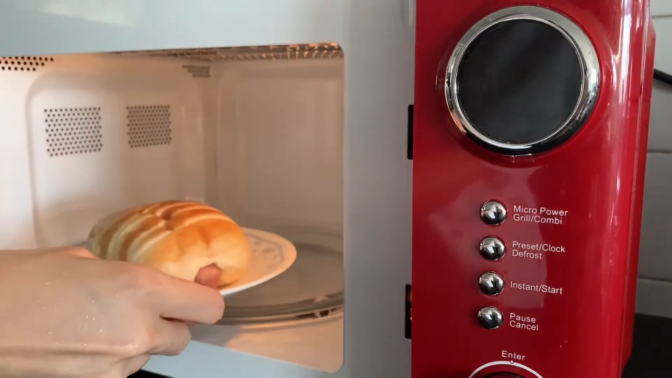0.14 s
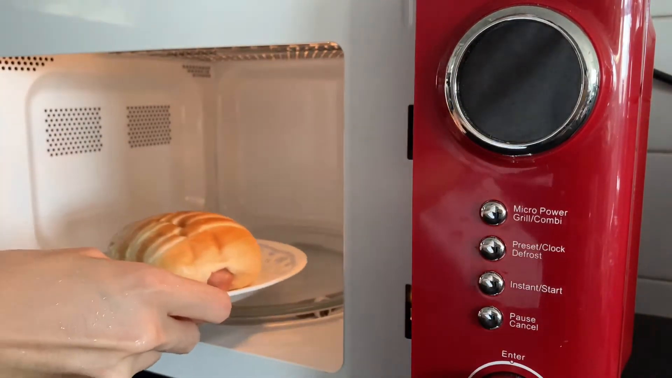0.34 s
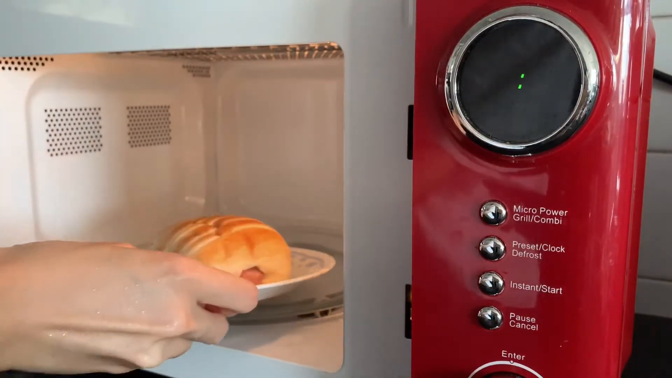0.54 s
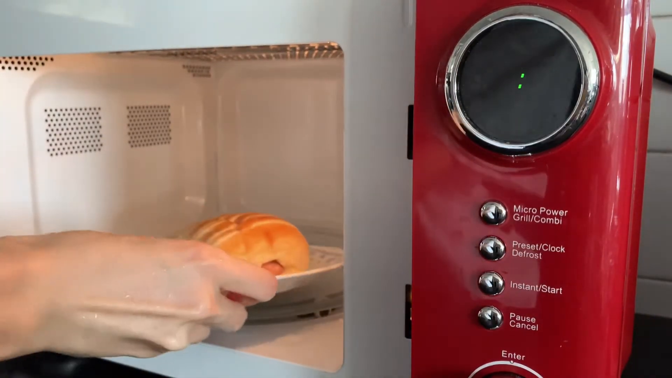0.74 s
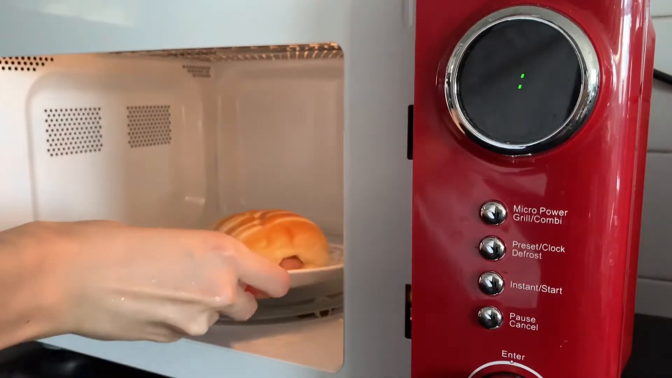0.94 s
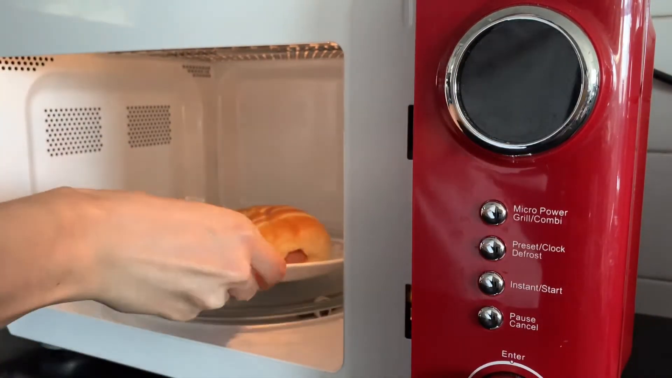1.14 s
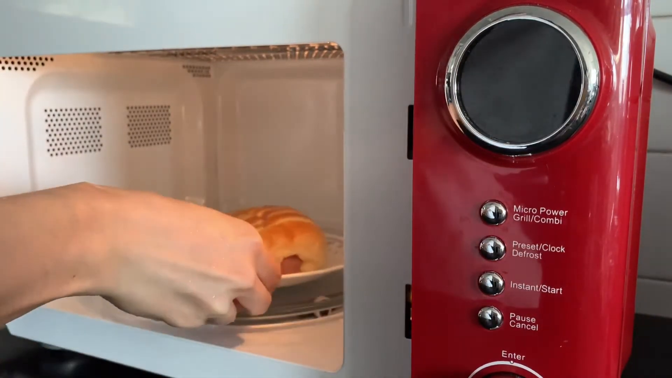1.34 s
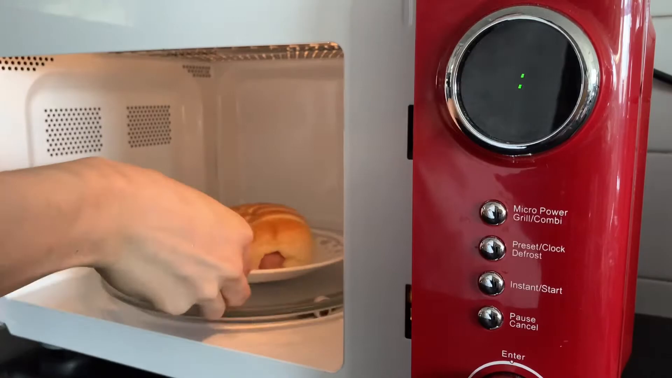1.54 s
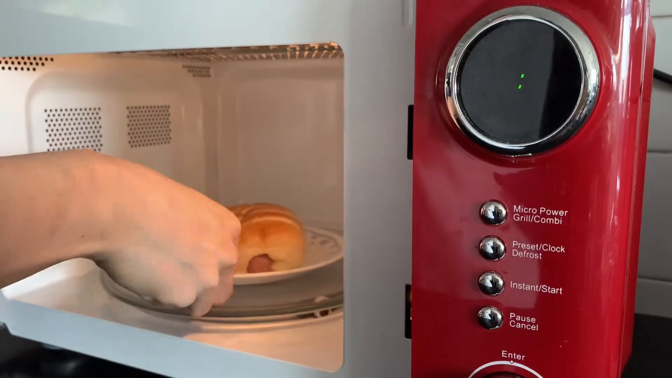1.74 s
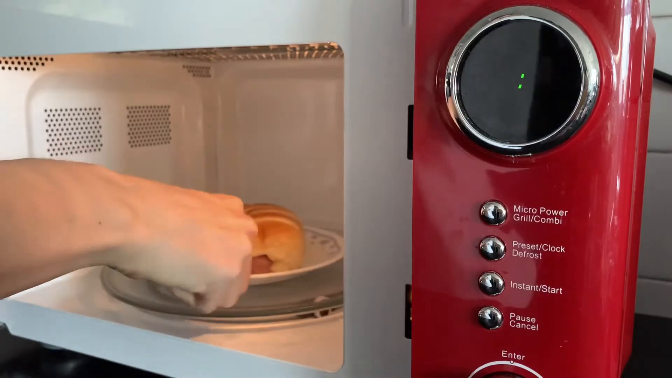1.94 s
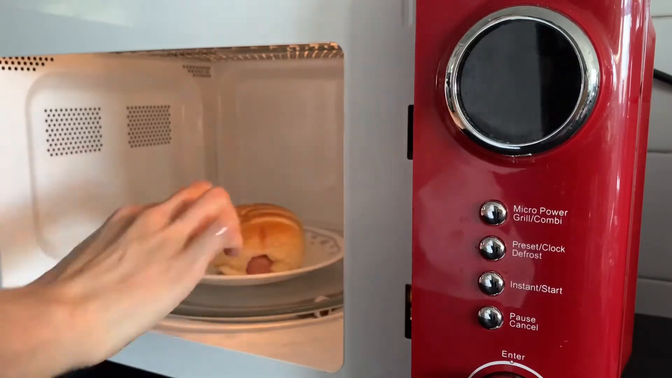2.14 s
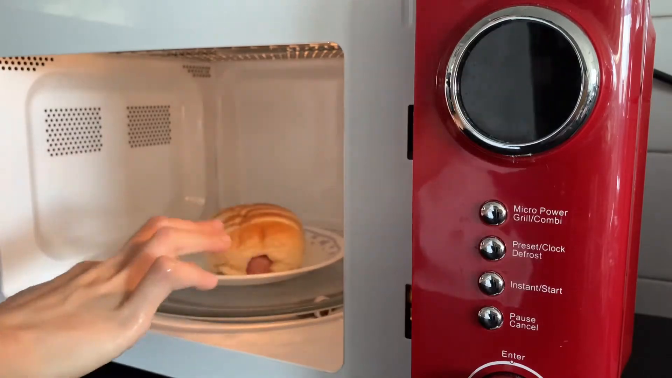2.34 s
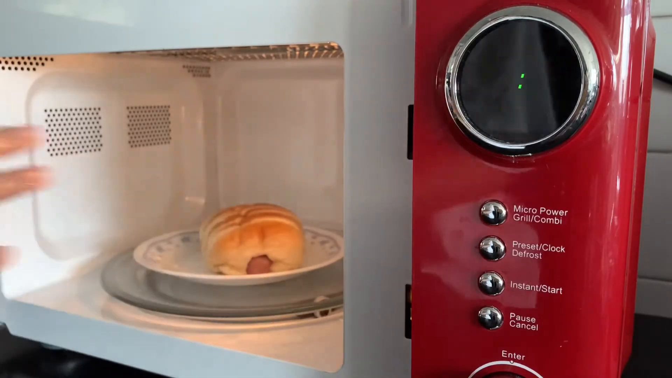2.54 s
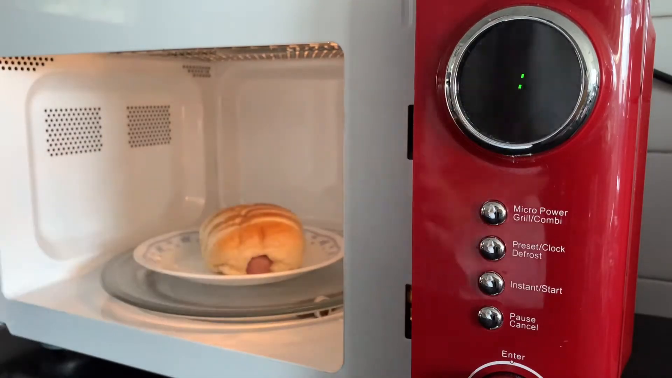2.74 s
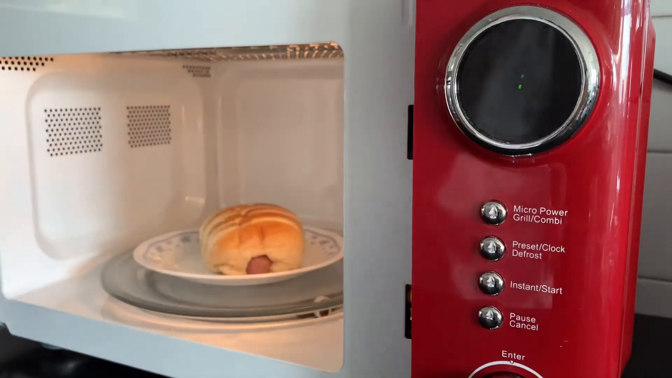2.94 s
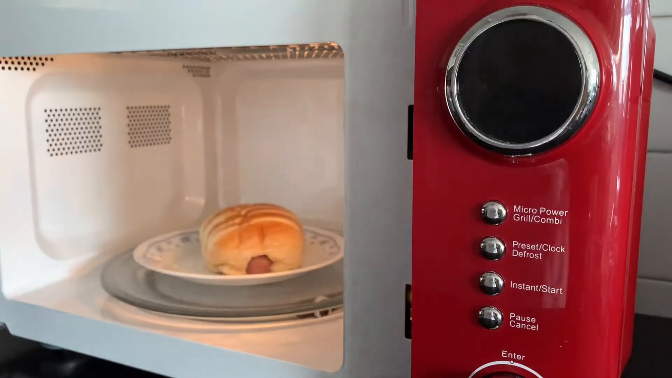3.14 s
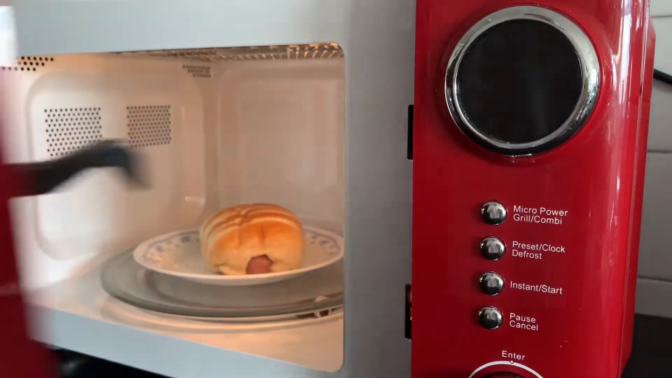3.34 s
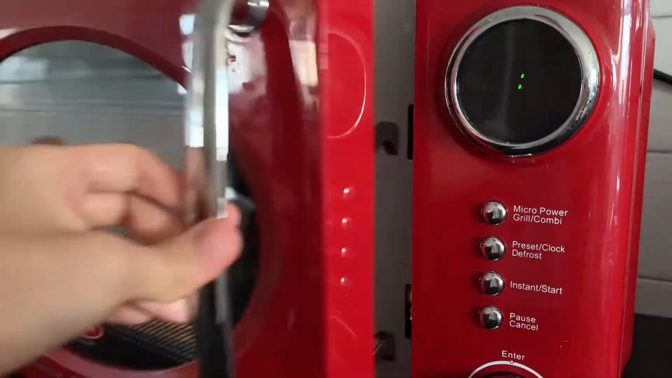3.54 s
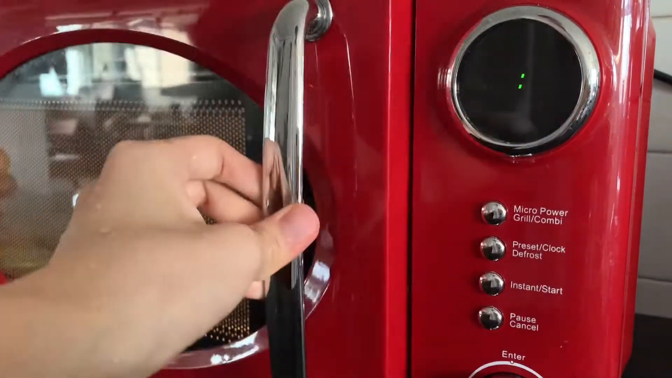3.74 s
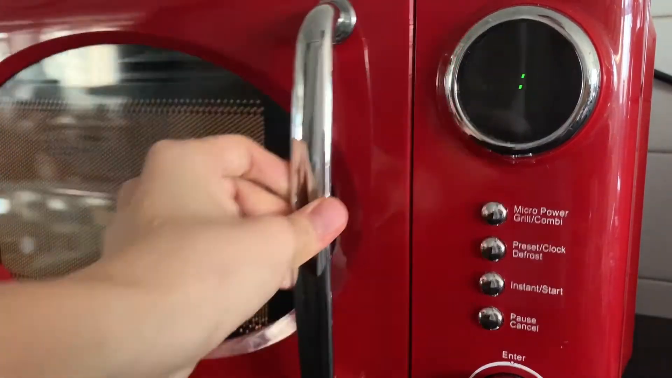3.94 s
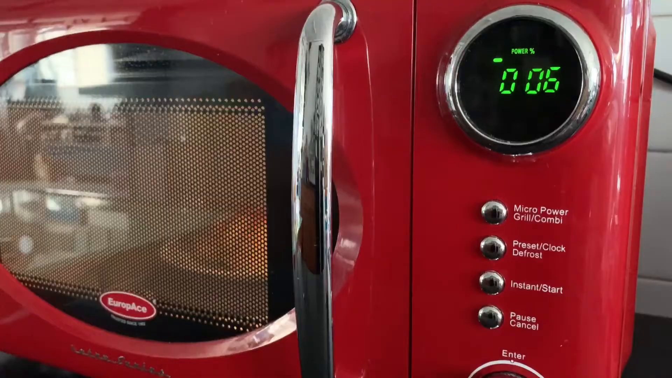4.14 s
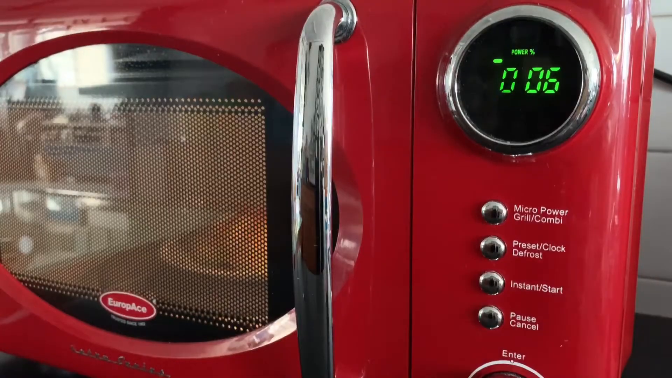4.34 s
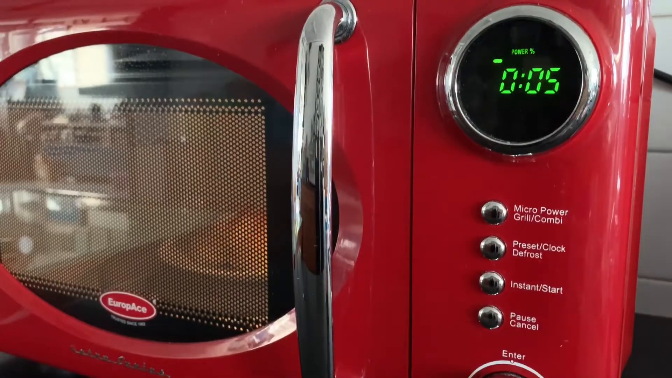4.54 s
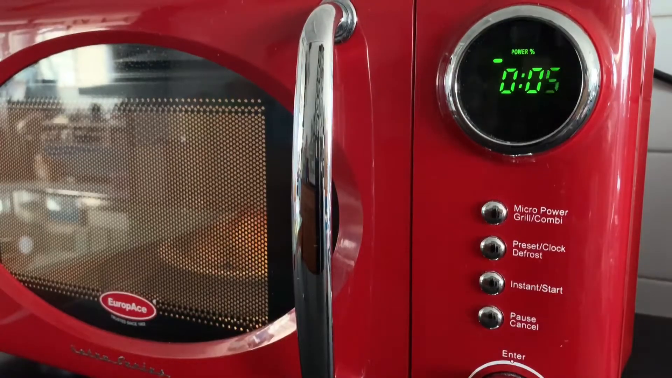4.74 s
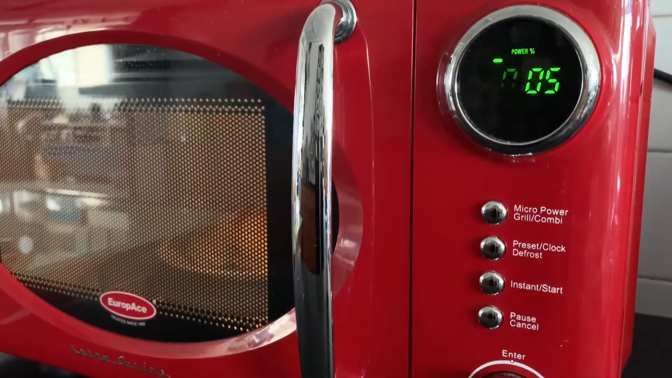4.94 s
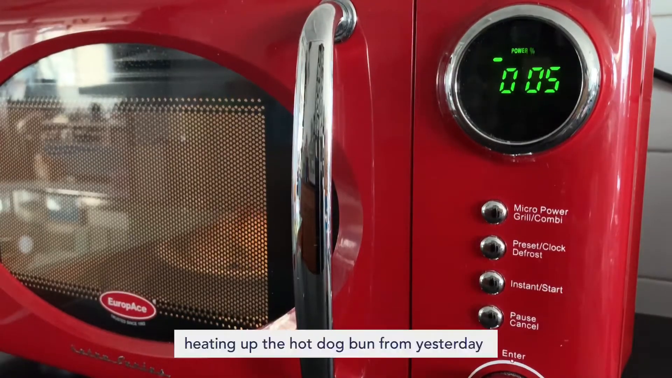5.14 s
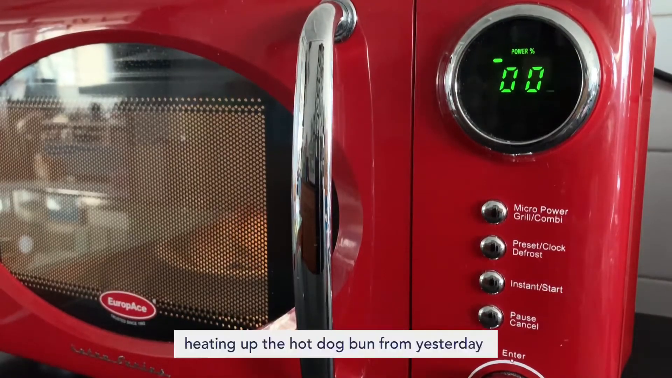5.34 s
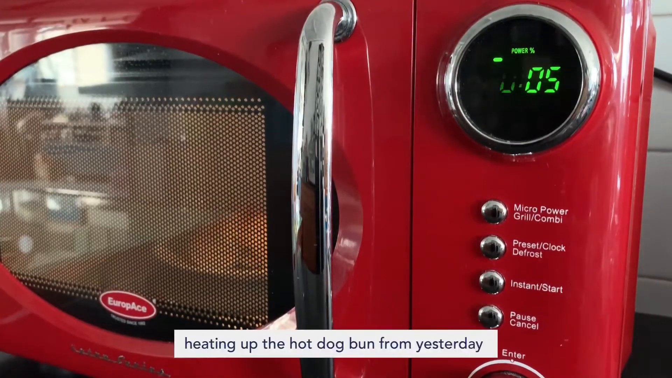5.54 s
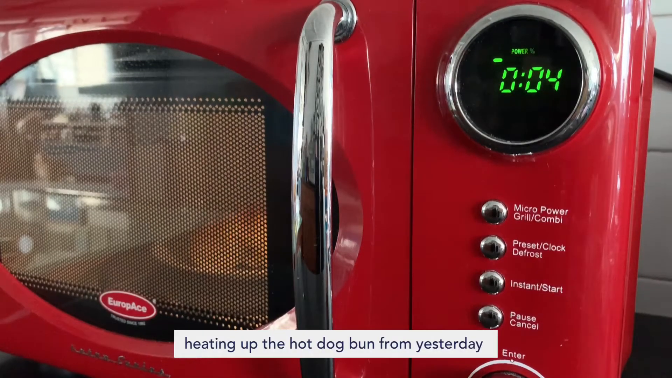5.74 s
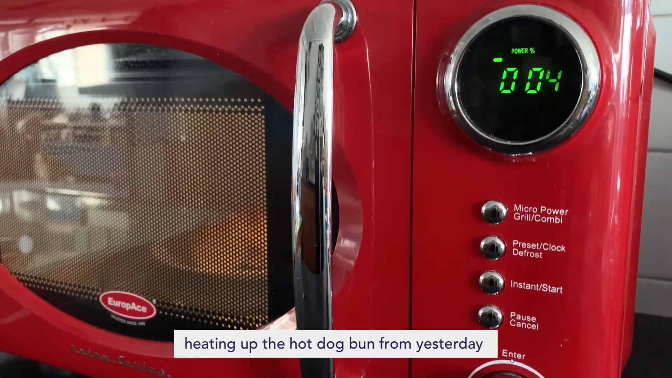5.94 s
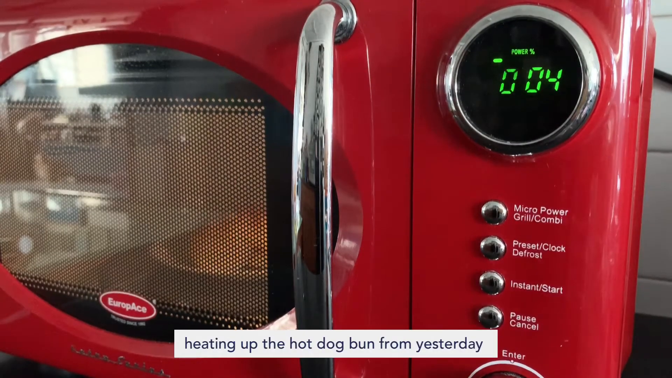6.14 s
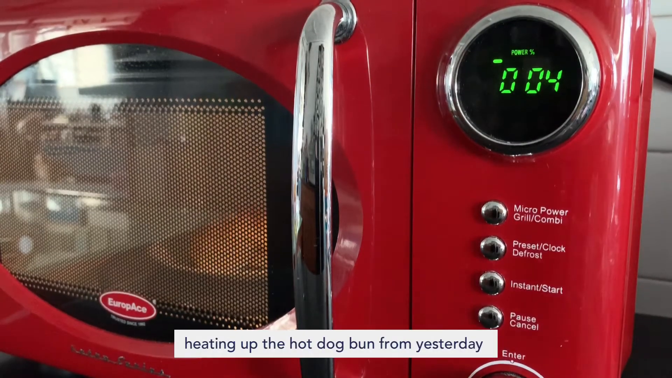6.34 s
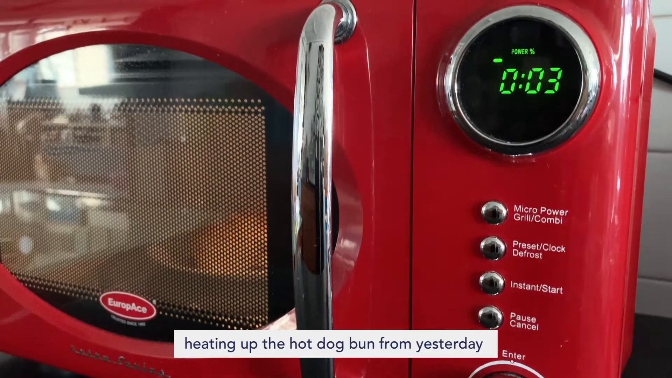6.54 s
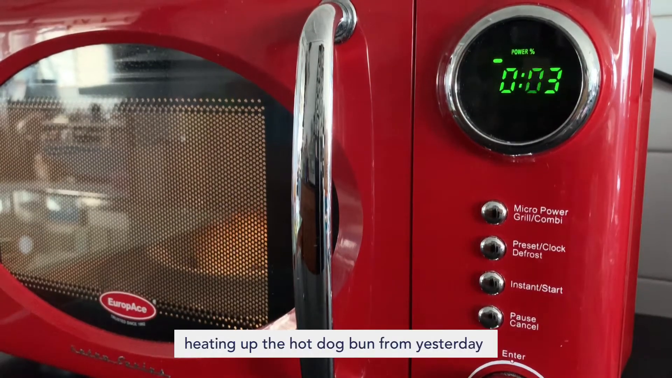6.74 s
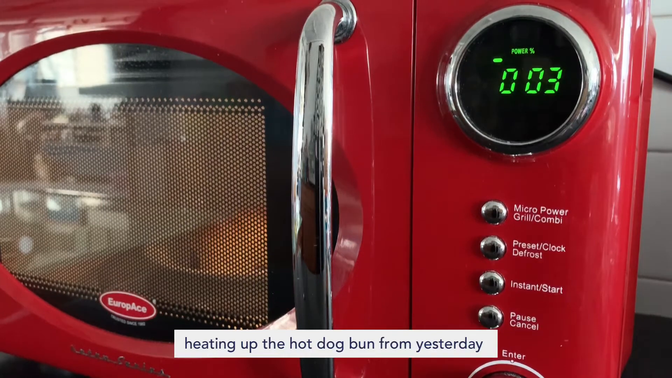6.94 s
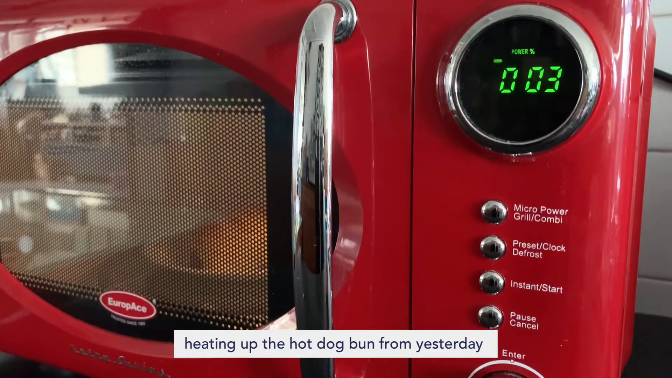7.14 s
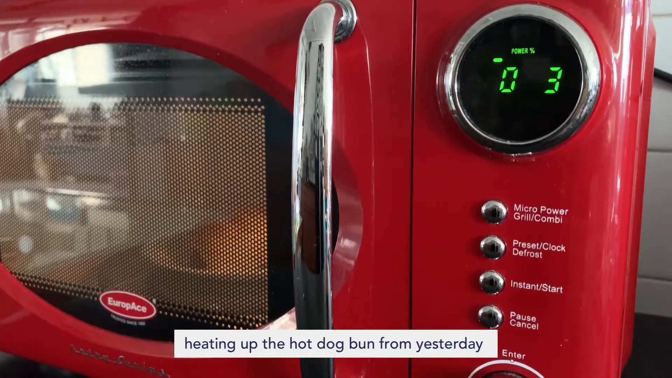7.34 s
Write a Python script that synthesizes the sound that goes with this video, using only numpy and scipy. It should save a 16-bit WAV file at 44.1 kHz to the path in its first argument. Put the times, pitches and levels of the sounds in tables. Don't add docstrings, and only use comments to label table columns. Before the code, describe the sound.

Bright plate clink on ringing glass, small nudges, a loud latching door slam, then abruptly a steady fan hum, a far thud and faint water.

```python
import sys
import numpy as np
from scipy import signal
from scipy.fft import rfft, irfft
from scipy.io import wavfile
from scipy.ndimage import uniform_filter1d

SR = 44100
rng = np.random.default_rng(int(sys.argv[2]) if len(sys.argv) > 2 else 0)


def ratio_of_db(decibels):
    return 10 ** (np.asarray(decibels, float) / 20)


def wrap_up_sound(samples):
    columns = np.atleast_2d(samples).T
    tamed = np.clip(columns, -1, 1)
    steps = np.round(tamed * 32767).astype(np.int16)
    wavfile.write(sys.argv[1], SR, steps)


N = 326340
CUT = 3.9664

# mode in Hz, level in dB, t60 in seconds.
PRESSED_PLATE = [(761, -14, 0.24), (820, -12, 0.2), (1100, -1, 0.19), (1350, 0.5, 0.12), (1470, 5.5, 0.064),
                 (1720, -1.5, 0.11), (2240, -18.5, 0.31), (3122, -16, 0.22), (3920, -21, 0.15),
                 (4730, -13.5, 0.06), (6400, -22.5, 0.082), (6970, -20, 0.1), (8850, -43, 0.099),
                 (9500, -34.5, 0.069)]
# mode in Hz, level in dB, t60 in seconds.
GLASS_KNOCK = [(242, -10, 0.38), (220.7, -15.5, 0.43), (491.7, -22.5, 0.33), (940, -17, 0.0077),
               (1140, 4.5, 0.01), (1667, 2.5, 0.036), (1720, -1, 0.042), (4000, -4, 0.0247)]


def evened(x):
    return x / np.sqrt(np.mean(x ** 2) + 1e-20)


def read(points, hz):
    f, value = np.transpose(points)
    return np.interp(np.log(hz + 1), np.log(f + 1), value)


def curve(rows, axis=1):
    rows = np.array(rows)
    return np.interp(np.arange(N) / SR, rows[:, 0], rows[:, axis])


def between(start, end):
    t = np.arange(N) / SR
    return np.clip(np.minimum(t - start, end - t) / .002 + 1, 0, 1)


def swells(rows, axis):
    growth_share, swell_db = 0.099, -24.5
    t = np.arange(N) / SR
    total = 0
    for row in rows:
        away = np.maximum((row[0] - t) / growth_share, t - row[0]) / row[-1]
        total = total + ratio_of_db(row[axis] + swell_db * away)
    return total


def noise(spectrum, patchy_db, size=1024, count=N):
    # frequency in Hz, left-right likeness from -1 to 1.
    likeness = [(60, 0.67), (130, 0.63), (290, 0.61), (640, 0.25), (1410, -0.33), (3100, 0.13),
                (6820, -0.02), (15000, 0.74)]
    frames, hz = count * 4 // size + 5, np.fft.rfftfreq(size, 1 / SR)
    a, b, c, d, patches = rng.standard_normal((frames, len(hz), 5)).T
    patches = uniform_filter1d(patches, size=10, axis=0)
    patches = evened(uniform_filter1d(patches, size=12, axis=1))
    same = np.clip(read(likeness, hz), -1, 1)[:, None]
    left = a + 1j * b
    right = same * left + np.sqrt(1 - same ** 2) * (c + 1j * d)
    z = np.array([left, right]) * ratio_of_db(read(spectrum, hz)[:, None] + patchy_db * patches)
    return evened(signal.istft(z, nperseg=size, noverlap=size * 3 // 4)[1][:, :count])


def fuzzy(hz, width):
    r = np.exp(-np.pi * width / SR)
    a, b = signal.lfilter([1], [1, -2 * r, r * r], rng.standard_normal((2, N)))
    carrier = np.exp(2j * np.pi * np.cumsum(hz * np.ones(N)) / SR)
    return evened((carrier * (a + 1j * b)).real)


def ring(modes, t, tilt_db, factor, chance, split, share=1):
    hz, db, t60 = np.transpose(modes)[:, :, None]
    place, lag = chance[:len(modes), :1], chance[:len(modes), 1:]
    level_db = db + tilt_db * np.log2(hz / 1000) + 1.5 * place
    decay = ratio_of_db(level_db - 60 * t / (np.maximum(t60, .01) * factor))
    beat = np.exp(2j * np.pi * hz * split * t)
    cluster = 1 + share * (0.9 * beat + 0.61 / beat ** 3 + 0.15 * beat ** 7)
    turn = np.exp(2j * np.pi * hz * t) * cluster
    between_ports = np.exp(1j * np.sign(lag) * np.minimum((hz / 1200) ** 2, .75))
    pair = np.array([(decay * turn * side).imag.sum(0) for side in (between_ports, 1 / between_ports)])
    return pair / abs(pair).max()


def strikes(rows, body, knock, knock_db, crack, split, crack_s, rise_s, share=1):
    out, t = np.zeros((2, N + SR)), np.arange(SR // 2) / SR
    brief = t[:6000]
    chance = rng.standard_normal((len(rows), 2, 32, 2))
    cracks, hz = noise(crack, 0, size=128, count=SR), np.fft.rfftfreq(6000, 1 / SR)
    for k, (s, db, tilt_db, factor, crack_db) in enumerate(rows):
        factor_ring = max(factor, .05)
        hit = ring(body, t, tilt_db, factor_ring, chance[k, 0], split, share)
        hit[:, :6000] += ratio_of_db(knock_db) * ring(knock, brief, 0, 0.92, chance[k, 1], split)
        tilt = ratio_of_db(tilt_db * np.log2(hz / 1000 + 0.22))
        spit = irfft(rfft(cracks[:, 3000 * k:][:, :6000]) * tilt)
        hit[:, :6000] += ratio_of_db(crack_db - 60 * brief / (crack_s * factor_ring)) * evened(spit) / 2
        hit *= np.minimum(t / rise_s, 1)
        at = round(s * SR)
        out[:, at:at + len(t)] += ratio_of_db(db) * hit / abs(hit).max()
    return out[:, :N]


def room(x):
    # frequency in Hz, t60 in seconds.
    reverb = [(100, 0.5), (500, 0.47), (2000, 0.17), (6000, 0.2), (14000, 0.16)]
    wash = noise([(20, 0.012), (20000, 0.032)], 0, size=256, count=SR // 2)
    hz, t, z = signal.stft(wash, SR, nperseg=256)
    tail = signal.istft(z * ratio_of_db(-60 * t / read(reverb, hz)[:, None]), SR, nperseg=256)[1]
    tail *= np.clip(np.arange(tail.shape[1]) / SR / 0.0024, 0, 1)
    return signal.fftconvolve(x.mean(0)[None], tail / np.linalg.norm(tail[0]), axes=1)[:, :N]


def air():
    # frequency in Hz, level in dB per Hz.
    air_spectra = [
        [(130, -38), (220, -6), (309, -1), (440, -10), (1000, -10.5), (2430, -20), (6800, -36.5), (8000, -50),
         (16000, -73.5)],
        [(20, -10), (113, -12), (170, -9), (216, -17), (319, -15.5), (410, -23), (923, -25.5), (2020, -34),
         (4810, -53.5), (11800, -82.5), ],
    ]
    air_db = [-53, -50]
    # frequency in Hz, level in dB per Hz.
    rumble_spectrum = [(12, -55), (39, -7), (54, -1), (102, -8), (146, 1), (189, -14), (220, -15),
                       (290, -74)]
    rumble_db, rumble_drift_db = -47, .7
    drift = uniform_filter1d(rng.standard_normal(N), size=9000)
    drift = evened(uniform_filter1d(drift, size=9000))
    street = ratio_of_db(rumble_db + rumble_drift_db * drift) * noise(rumble_spectrum, 0.67, size=4096)
    before = ratio_of_db(air_db[0]) * noise(air_spectra[0], 1.6, size=2048) + street
    after = ratio_of_db(air_db[1] + 5) * noise(air_spectra[1], 1.0, size=2048)
    return before * between(0, CUT) + after * between(CUT, 8)


def hum():
    # Hz, level in dB, fuzz width in Hz.
    mains = [(98.7, -50, 4.1), (195, -61.5, 14)]
    # Hz, level in dB, width in Hz.
    drones = [(137.2, -48.5, 7.8), (186, -43.5, 1.3), (1105, -68.5, 45), (6540, -94, 80), (57.3, -57, 4.5),
              (135, -45.5, 20), (123.5, -56.5, 4), (96, -57, 0.62)]
    # start in seconds, end in seconds.
    drone_spans = [(2.3, 2.8), (3.66, 3.96), (2.3, 3.4), (1.6, 3.3), (0, 3.9), (0, .6), (.8, 1.6), (0, 3.9)]
    # time in seconds, blade tone in Hz, its level in dB, octave level in dB.
    fan = [
        (3.97, 163.1, -43.5, -55),
        (5.4, 161, -44, -54.5),
        (7.4, 162.1, -41.5, -52),
    ]
    t = np.arange(N) / SR
    low, high = (ratio_of_db(db) * (1.03 * np.sin(2 * np.pi * hz * t) + .5 * fuzzy(hz, width)) for hz, db, width in mains)
    stray = 0
    for (hz, db, width), span in zip(drones, drone_spans):
        stray = stray + ratio_of_db(db) * fuzzy(hz, width) * uniform_filter1d(between(*span), size=2000)
    turns = 2 * np.pi * np.cumsum(curve(fan)) / SR
    blade = ratio_of_db(curve(fan, axis=2)) * (1.37 * np.sin(turns) + 0.031 * fuzzy(curve(fan), 24))
    octave = ratio_of_db(curve(fan, axis=3)) * (1.11 * np.sin(2 * turns) + 0.1 * fuzzy(2 * curve(fan), 5.6))
    return low + stray * between(0, CUT) + (high + blade + octave) * between(CUT, 8)


def water_and_cloth():
    # frequency in Hz, level in dB per Hz.
    body_spectrum = [(180, -31.5), (300, -5.5), (494, -7.5), (666, -7), (1300, -10), (3830, -23.5),
                     (9000, -54.5), (19800, -120)]
    # frequency in Hz, level in dB per Hz.
    fizz_spectrum = [(2350, -36.5), (4000, -1.5), (4370, -6), (6480, -12.5), (8700, -27.5), (11700, -36.5),
                     (15600, -58), (22000, -120)]
    # crest in seconds, body in dB, fizz in dB, length in seconds.
    swishes = [
        (4.18, -72, -93, 0.25),
        (4.94, -66.5, -75.5, 0.66),
        (5.058, -50.5, -69.5, 0.21),
        (5.2, -66, -77.5, 0.15),
        (5.45, -64, -102, 0.14),
        (5.64, -64.5, -76, 0.27),
        (7.4, -67.5, -71, 0.83),
    ]
    # crest in seconds, level in dB, length in seconds.
    sprays = [
        (6.72, -87, 0.13),
        (7.4, -88, 1.2),
    ]
    lull_db = [-85.5, -93.5]
    tap_db = [-69, -79.5]
    tap_s, tap_open_s = 6.08, .08
    whistle_start_s, whistle_end_s, whistle_ease_s, whistle_db = 6.1, 6.95, .2, -80

    tap = np.clip((np.arange(N) / SR - tap_s) / tap_open_s + .5, 0, 1)
    body_level = swells(swishes, axis=1) + ratio_of_db(lull_db[0]) + ratio_of_db(tap_db[0]) * tap
    fizz_level = swells(swishes, axis=2) + ratio_of_db(lull_db[1]) + ratio_of_db(tap_db[1]) * tap
    body = body_level * ratio_of_db(5.0) * noise(body_spectrum, 3, size=256)
    fizz = fizz_level * ratio_of_db(5.0) * noise(fizz_spectrum, 1.6, size=256)
    hiss = [(11000, -64), (12300, -8.0), (14000, 1), (15300, -18.0), (16000, -55.0)]  # Hz, dB per Hz
    top = swells(sprays, axis=1) * noise(hiss, 2.0, size=256)
    blowing = uniform_filter1d(between(whistle_start_s, whistle_end_s), size=round(whistle_ease_s * SR))
    whistle = ratio_of_db(whistle_db) * blowing * np.array([fuzzy(4020, 30), fuzzy(4020, 30)])
    return (body + fizz + top + whistle) * between(CUT, 8)


def far_thud():
    # mode in Hz, level in dB, t60 in seconds.
    thud_modes = [(206, 3, 0.095), (347, -3, 0.2), (595, -3.5, 0.2), (653, -0.5, 0.33), (976, 2.5, 0.17),
                  (1145, 1.5, 0.18), (1460, 8.5, 0.1), (1760, 2, 0.084), (3210, -10.5, .08)]
    # frequency in Hz, level in dB per Hz.
    thud_crack = [(290, -27), (651, -13), (1330, -15), (1470, -11), (2400, -11.5), (5080, -23),
                  (10000, -59), (22000, -120)]
    # start in seconds, peak in dB, treble tilt in dB an octave, factor on ring time, crack in dB.
    thud_hits = [
        (4.93, -44, -3.5, 0.79, -19),
        (4.975, -38.5, -6.5, 1, -14),
        (5.056, -31, 2.5, 0.73, -10),
        (5.084, -33.5, -3, 0.69, -2.5),
        (5.105, -38, -1.5, 0.88, -2),
        (5.129, -37.5, 1, 0.47, -15),
        (5.195, -44, 2, 0.67, 12),
    ]
    far = strikes(thud_hits, thud_modes, GLASS_KNOCK, -30.0, thud_crack, split=0.029, crack_s=0.035, rise_s=0.0024)
    return far + ratio_of_db(3.0) * room(far)


def change_tick():
    tick_db = [
        [-34],
        [-40],
    ]
    growth_s = .0001
    return ratio_of_db(np.array(tick_db)) * np.exp(np.minimum(np.arange(N) / SR - CUT, 0) / growth_s)


def door_shut():
    # mode in Hz, level in dB, t60 in seconds.
    case_modes = [(87.9, -11.5, 0.077), (149, -4, 0.1), (251, -9, 0.13), (364, -6, 0.09),
                  (470, -4.5, 0.041), (456, 5.5, 0.03), (590, -20, 0.038), (672, -2, 0.11),
                  (952, -10.5, 0.071), (1493, -7, 0.07), (1740, -6, 0.042), (2160, -15, 0.047),
                  (1254, -9, 0.07), (3500, -22.5, 0.05)]
    # mode in Hz, level in dB, t60 in seconds.
    latch_modes = [(4050, 8.5, 0.011), (4770, 2.5, 0.011), (2290, 6, 0.012), (6150, -7, 0.015),
                   (7700, -13, 0.012), (9500, -13, .008)]
    # mode in Hz, level in dB, t60 in seconds.
    frame_modes = [(152, -8, 0.2), (270, -1.5, 0.12), (333, -4, 0.33), (422, -1.5, 0.14),
                   (562, -27.5, 0.055), (730, 1, 0.06), (940, -17, .06), (1113, -8.5, 0.076),
                   (1770, -17, .05), (2600, -6, 0.04), (3560, -12.5, 0.037)]
    # frequency in Hz, level in dB per Hz.
    door_crack = [(180, -32.5), (400, 3), (1840, -9), (2700, -19), (3580, -12), (10500, -37.5),
                  (12200, -54), (14300, -42)]
    # frequency in Hz, level in dB per Hz.
    hook_crack = [(120, -43.5), (200, -5), (430, -8), (600, -30.5), (1120, -4.5), (2440, -18.5),
                  (9000, -59), (19800, -120)]
    # start in seconds, peak in dB, tilt in dB an octave, ring factor, crack in dB.
    hook_hits = [
        (3.654, -47.5, 6.5, 0.46, -1),
        (3.6575, -26.5, 1.5, 1.7, -9),
        (3.669, -41, -17.5, 0.22, 2),
        (3.8215, -40, 2.5, 0.43, -11),
        (3.827, -18.5, -6, 0.54, 5),
        (3.836, -26.5, 0.5, 1.9, -17),
    ]
    # start in seconds, peak in dB, tilt in dB an octave, ring factor, crack in dB.
    snap_hits = [
        (3.8255, -20, 1.8, 1.5, -3.5),
        (3.844, -46.5, 2, 4, 5.5),
        (3.855, -44, 2, 4, 8.5),
        (3.868, -42, 2, 4, 8),
        (3.88, -43.5, 2, 4, 5.5),
    ]
    # start in seconds, peak in dB, tilt in dB an octave,
    # ring factor, crack in dB.
    door_hits = [(3.8955, -29, 3.5, 0.76, -8), (3.8975, -17.5, -1, 4.2, -17), (3.903, -20, 5.5, 0.51, -0.5),
                 (3.913, -20, 1.5, 0.44, 0), (3.92, -8.5, 1, 1.4, -6.5), (3.9235, -4, 3, 0.31, 7),
                 (3.9265, 0, 1.5, 0.62, -16), (3.934, -5, -4.5, 0.56, -17.5),
                 (3.946, -14.5, -6.5, 0.28, -8), (3.956, -20.5, 3.5, 1.1, 2), (3.94, -19.5, -0.5, .6, 2.5)]
    door = strikes(hook_hits, frame_modes, latch_modes, -26, hook_crack, split=0.013, crack_s=0.076, rise_s=0.0014)
    door += strikes(snap_hits, latch_modes, frame_modes, -16.5, door_crack, split=0.018, crack_s=0.02, rise_s=0.0013)
    door += strikes(door_hits, case_modes, latch_modes, -21.5, door_crack, split=0.027, crack_s=0.088,
                    rise_s=0.0014, share=0.83)
    return door - uniform_filter1d(door, size=800)


def clutter():
    # centre in Hz, level in dB.
    crowds = [(350, -11.5), (560, -11.5), (790, -7), (1050, 1), (2680, -8), (3120, -8.5), (3450, -13),
              (3750, -5), (4080, -6), (4330, -2.5), (4780, -16), (5400, -30.5), (6000, -17.5), (7000, -17)]
    start_s, level_db, t60_s, stray = .545, -40.5, .36, 0.04
    out, t, luck = np.zeros((2, N)), np.arange(SR // 3) / SR, rng.random((8 * len(crowds), 3))
    hz, db = np.repeat(crowds, 8, axis=0).T
    hz = hz * (1 + stray * np.tan(2.7 * (luck[:, 0] - .5)))
    modes = np.c_[hz, db - 8 * luck[:, 1], t60_s * (.5 + luck[:, 2])]
    song = ring(modes, t, 0, 1, rng.standard_normal((len(hz), 2)), .004, 0.85)
    song *= np.minimum(t / 0.019, 1)
    out[:, round(start_s * SR):][:, :len(t)] = ratio_of_db(level_db) * evened(song)
    return out


def dragged_glass():
    # time in seconds, pitch in Hz, level in dB.
    song_line = [
        (.79, 1860, -75),
        (.82, 1860, -64),
        (.93, 1800, -54),
        (.95, 1700, -68),
        (.985, 1560, -56),
        (1.02, 1567, -56),
        (1.14, 1486, -54),
        (1.16, 1520, -75),
    ]
    width_hz = 75
    level = ratio_of_db(curve(song_line, axis=2)) * between(song_line[0][0], song_line[-1][0])
    return level * np.array([fuzzy(curve(song_line), width_hz), fuzzy(curve(song_line), width_hz)])


def slide():
    # time in seconds, level in dB.
    drag_level = [
        (.7, -50),
        (.95, -64),
        (1.05, -55.5),
        (1.2, -71),
        (1.6, -63),
    ]
    catches = rng.standard_normal(N) * (rng.random(N) < 700 / SR) * between(0.54, 1.5)
    t = np.arange(5000) / SR
    song = ring(PRESSED_PLATE, t, .6, 0.36, rng.standard_normal((32, 2)), 0.023) * np.minimum(t * 500, 1)
    sung = signal.oaconvolve(catches[None], song, axes=1)[:, :N]
    return ratio_of_db(curve(drag_level) - 8.0) * evened(sung)


def rocks():
    # start in seconds, peak in dB, pitch in Hz.
    rock_notes = [(.5435, -9.5, 1760), (0.5898, -17.5, 1760), (0.599, -20, 1760), (0.631, -27.5, 1720),
                  (0.643, -22.5, 1768), (.68, -32, 1763), (.797, -29, 1869), (.7, -35, 1740),
                  (.745, -36, 1834), (.798, -40, 1055), (1.016, -36.5, 1615)]
    # start in seconds, level in dB.
    rim_starts = [
        (.572, -33.5),
        (.712, -36.5),
        (.87, -42),
    ]
    rim_hz, rim_t60_s = 1241, .7
    grip_s, grip_db = .8, -8
    rock_t60_s, freeing = 0.06, 0.13
    out, t = np.zeros((2, N)), np.arange(SR // 2) / SR
    first_s = rock_notes[0][0]
    notes = [(s, db, hz, rock_t60_s + freeing * (s - first_s)) for s, db, hz in rock_notes]
    notes += [(s, db, rim_hz, rim_t60_s) for s, db in rim_starts]
    for (s, db, hz, t60), luck in zip(notes, rng.standard_normal((len(notes), 4, 2))):
        is_rim = hz == rim_hz
        note = [(hz, 0, t60), (4850, -30, .05), (7100, -30, .05), (9600, -36, .05)]
        db = db + grip_db * is_rim * np.clip((s + t - grip_s) / .02, 0, 1)
        rise = np.minimum(t / (.0015 + .012 * (s - first_s)), 1)
        song = ring(note, t, 0, 1, luck, .008 * (not is_rim), .35)
        out[:, round(s * SR):][:, :len(t)] += ratio_of_db(db) * song * rise
    return out


def china_plate():
    # mode in Hz, level in dB.
    free_ring = [(1130, -20), (2223, -12.5), (2941, 0), (3520, -19.5), (3750, -6.5), (4016, -19.5),
                 (4268, -15), (4385, -6), (4791, -23), (5600, -26), (6040, -11.5), (6691, -16.5),
                 (7117, -18.5), (7940, -28),
                 (3230, -18.5), (8780, -28), (8982, -15), (9415, -23), (10020, -25.5), (13110, -30.5),
                  (13290, -33.5), (13860, -28), (14500, -35)]
    # mode in Hz, level in dB, t60 in seconds.
    glass_modes = [(505, -20, .22), (720, -24, .15), (1000, -8, .12), (1760, 1, .15)]
    # mode in Hz, level in dB, t60 in seconds.
    flat_plate = [(505, -6.5, 0.38), (735, -1, 0.15), (1100, -5.5, 0.19), (1290, -11, 0.092),
                  (1860, -5, 0.13), (2140, -3.5, 0.17), (2930, -12, 0.27), (3620, -18, 0.29),
                  (4320, -8, 0.08), (4830, -16.5, 0.092), (6490, -23.5, 0.11), (6800, -19.5, 0.073),
                  (9100, -34, 0.086), (9730, -32, 0.073)]
    # frequency in Hz, level in dB per Hz.
    china_crack = [(550, -14), (1050, 9), (2200, -9), (3630, -20.5), (5790, -44), (7110, -29.5),
                   (8050, -61.5), (16000, -59.5)]
    # start in seconds, peak in dB, treble tilt in dB an octave, factor on ring time, crack in dB.
    clink_hits = [
        (.537, -29, 1, 0.18, -7.5),
        (.5425, -17.5, 6.5, 0.073, -13),
        (.5445, -4.5, 3, 0.61, 5),
        (.5468, -17.5, 1, 0.044, 0.5),
    ]
    pressed_hits = [
        (1.058, -57, 15, 0.54, -2),
        (1.1565, -25, 1, 1.1, -10),
        (1.179, -27.5, 3, 1.05, -21),
        (1.19, -32, -6, 0.42, -7),
        (1.2485, -32, 0, 1.9, -15),
        (1.262, -35, 3, 0.46, 6),
        (1.393, -55, 9, 3.7, -15),
        (1.492, -42.5, 2, 2.2, 2),
    ]
    flat_hits = [
        (1.7915, -24.5, 7, 0.64, 4.5),
        (1.8, -31, 0.5, 1.1, -2),
        (1.812, -35, -1.5, 1.3, -3),
        (1.83, -45, 3, 0.99, -8),
        (1.848, -41.5, 1.5, 2.2, -23),
        (2.312, -37.5, 2.5, 0.51, -3),
        (2.325, -37.5, -3, 1.1, -1),
        (2.375, -43, -9, 1.3, -8),
    ]
    pans_db = [-1, 0.2]
    ring_s, ring_fall = 0.52, 0.5
    free = glass_modes + [(hz, db, ring_s * (3000 / hz) ** ring_fall) for hz, db in free_ring]
    clink = strikes(clink_hits, free, GLASS_KNOCK, 6.9, china_crack, split=0.002, crack_s=0.026,
                    rise_s=0.00054, share=.4)
    plate = (clink + rocks() + slide()) * ratio_of_db(pans_db[0] * np.c_[[1, -1]])
    plate += strikes(pressed_hits, PRESSED_PLATE, GLASS_KNOCK, -28.0, china_crack, split=0.005, crack_s=0.071,
                     rise_s=0.0025)
    plate += strikes(flat_hits, flat_plate, GLASS_KNOCK, -1.3, china_crack, split=0.01, crack_s=0.066, rise_s=0.0033)
    return plate


def scene():
    fade_s = .0006
    plate = china_plate()
    door = ratio_of_db(0.2 * np.c_[[1, -1]]) * door_shut()
    near = plate + door + room(ratio_of_db(-5.5) * plate + ratio_of_db(-10.5) * door)
    near *= np.clip((CUT - np.arange(N) / SR) / fade_s, 0, 1)
    first_scene = near + clutter() + dragged_glass() + change_tick()
    kitchen = far_thud() + air() + hum() + water_and_cloth()
    return first_scene * (np.arange(N) < CUT * SR) + kitchen


def band_limit(x):
    return signal.sosfilt(signal.butter(12, 16490, fs=SR, output="sos"), x)


def record(dry):
    ceiling = .8
    bass_cut = signal.butter(2, 38, "highpass", fs=SR, output="sos")
    edge = signal.firwin(255, 15900, fs=SR)
    soft = ceiling * np.tanh(signal.sosfilt(bass_cut, dry) / ceiling)
    mix = signal.oaconvolve(soft, edge[None], "same")
    return band_limit(mix)


dry = scene()
out = record(dry)
wrap_up_sound(out)
```